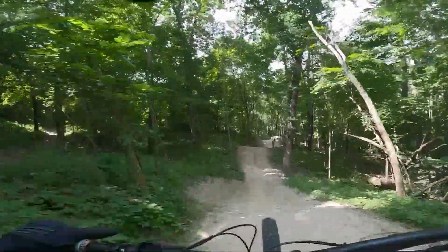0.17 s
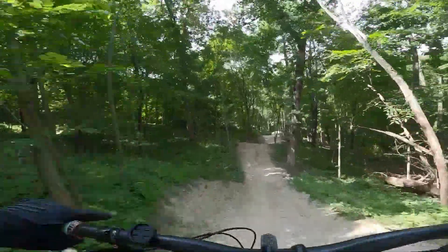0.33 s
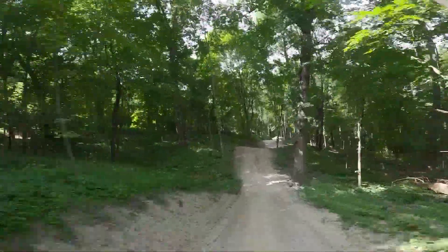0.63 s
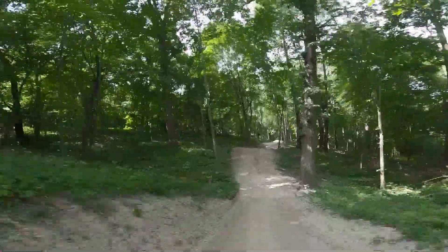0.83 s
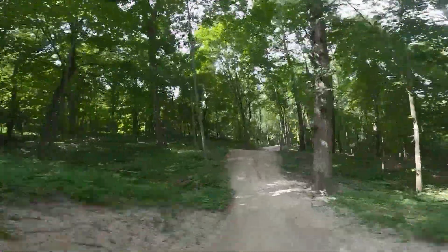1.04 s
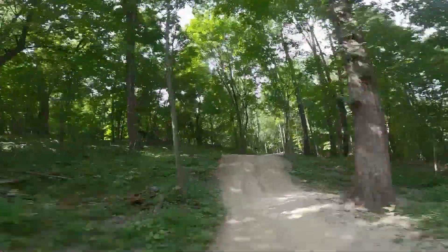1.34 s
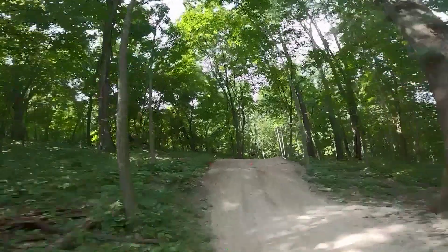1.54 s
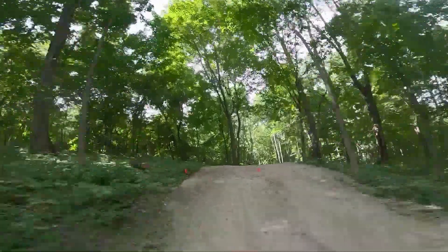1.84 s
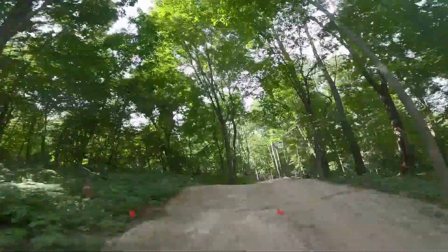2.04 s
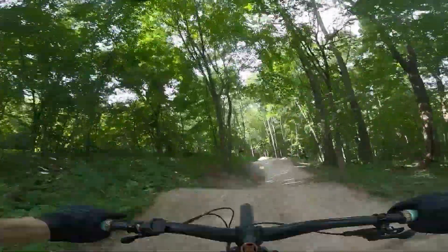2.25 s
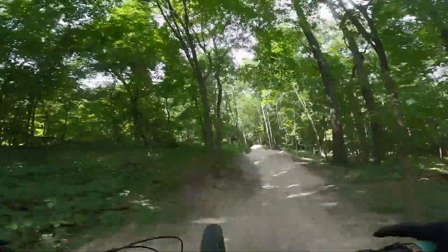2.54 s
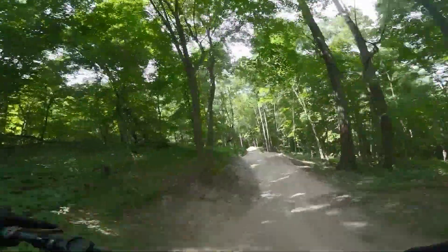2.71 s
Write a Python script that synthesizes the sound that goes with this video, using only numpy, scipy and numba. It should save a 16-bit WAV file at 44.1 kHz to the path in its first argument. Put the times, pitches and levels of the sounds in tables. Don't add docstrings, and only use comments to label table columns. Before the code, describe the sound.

A mountain bike rides a woodland dirt trail: a knock at take-off, windy quiet in the air, a hard clattering landing, bumpy rolling, then a second take-off thump and quiet. Close microphone on the rider, buffeted by wind.

```python
import sys
import numpy as np
from scipy import signal
from scipy.fft import rfft, irfft
from scipy.io import wavfile
from scipy.ndimage import uniform_filter1d
from numba import njit

SR = 44100
rng = np.random.default_rng(int(sys.argv[2]) if len(sys.argv) > 2 else 0)


def to_linear_factor(level_db):
    exponent = np.asarray(level_db, float) / 20
    return 10 ** exponent


def output_pcm(signal):
    pcm = np.clip(np.atleast_2d(signal).T, -1, 1) * 32767
    wavfile.write(sys.argv[1], SR, np.round(pcm).astype(np.int16))


N = 127008


def unit(x):
    return x / np.sqrt(np.mean(x ** 2))


def curve(table, axis=1):
    rows = np.array(table, float)
    return np.interp(np.arange(N) / SR, rows[:, 0], rows[:, axis])


@njit
def svf(x, centre_hz, width_hz):
    y, band_state, low_state = np.empty(len(x)), 0., 0.
    for i in range(len(x)):
        g = np.tan(np.pi * centre_hz[i] / SR)
        k = width_hz / centre_hz[i]
        v = (band_state + g * (x[i] - low_state)) / (1 + g * (g + k))
        band_state = 2 * v - band_state
        low_state = low_state + 2 * g * v
        y[i] = k * v
    return y


def band(x, centre_hz, width_hz):
    return svf(x, centre_hz * np.ones(len(x)), float(width_hz))


def band_twice(x, centre_hz, width_hz, second_width_hz):
    return unit(band(band(x, centre_hz, width_hz), centre_hz, second_width_hz))


def low_pass(x, order, top_hz):
    return signal.sosfilt(signal.butter(order, top_hz, fs=SR, output="sos"), x)


def walk(rate_hz):
    hold = int(SR / rate_hz)
    steps = np.repeat(rng.standard_normal(N // hold + 1), hold)
    slewed = uniform_filter1d(uniform_filter1d(steps, hold), hold)
    return unit(slewed[:N])


def grains(per_s, spread_db):
    hit = rng.random(N) < per_s / SR
    size_db = spread_db * np.minimum(rng.exponential(size=N), 3.5)
    return hit * to_linear_factor(size_db) * rng.standard_normal(N)


def shade(x, colour):
    f_hz = np.arange(N // 2 + 1) * SR / N + 1e-3
    hz, db = np.array(colour, float).T
    gain_db = np.interp(np.log(f_hz), np.log(hz), db, left=-90, right=-90)
    return irfft(rfft(x) * to_linear_factor(gain_db), N)


def body(x, peaks, stretch=1):
    modes = [(-1) ** k * to_linear_factor(db) * band(x, hz * stretch, width_hz)
             for k, (hz, width_hz, db) in enumerate(peaks)]
    return unit(sum(modes))


def hits(events, make):
    length = 4096
    out, t = np.zeros(N + length), np.arange(length) / SR
    for (start_s, peak_db, hz), noise in zip(events, rng.standard_normal((len(events), length))):
        sound = make(t, noise, hz)
        start = int(start_s * SR)
        out[start:start + length] += to_linear_factor(peak_db) * sound / np.abs(sound).max()
    return out[:N]


def wind():
    # start_s, level_db, treble_tilt_db
    strength = [(0, -15.5, 3), (.12, -17.5, 1.5), (.31, -15, -2.5), (.42, -18, -1), (.55, -22.5, 6.5),
                (.72, -18.5, -3), (1.04, -18, 1), (1.17, -19, 2), (1.56, -17.5, -0.5), (1.8, -20, 4),
                (2.1, -18, 4), (2.3, -14, 4), (2.34, -16.5, -20.5), (2.4, -19.5, -3), (2.5, -18, -3),
                (2.62, -23, -0.5), (2.72, -27.5, 4.5), (2.88, -33, 6.5)]
    # freq_hz, density_db (per Hz)
    colour = [(12, -24), (22, -0.5), (100, -3), (230, -15.5), (600, -24.5), (1700, -40), (5000, -51.5),
              (9000, -65), (14000, -85)]
    spectrum = rfft(shade(rng.standard_normal(N), colour))
    f_octave = np.log2(np.arange(N // 2 + 1) * SR / N + 1)
    gust_db = 1.5 * walk(1.45) + 1.27 * walk(22.15)
    tilt_db = curve(strength, axis=2)
    out = 0
    for octave in np.arange(4.5, 15):
        part = irfft(spectrum * np.clip(1 - np.abs(f_octave - octave), 0, 1), N)
        level_db = gust_db * np.clip((octave - 5) / 4, .1, 1.2) + 0.28 * walk(16)
        level_db = level_db + tilt_db * np.clip((octave - 8) / 3, 0, 1)
        out = out + part * to_linear_factor(level_db)
    return unit(out) * to_linear_factor(curve(strength))


def spray():
    # start_s, full_s, end_s, level_db
    bursts = [
        (0.51, 0.712, .82, -46.5),
        (2.733, 2.796, 3.0, -56.5),
    ]
    centre_hz, width_hz = 5940, 2500
    t = np.arange(N) / SR
    dust = band_twice(rng.standard_normal(N), centre_hz, width_hz, width_hz)
    swell = sum(to_linear_factor(level_db) * np.interp(t, [start_s, full_s, end_s - .02, end_s], [0.039, 0.87, 0.94, 0.012])
                for start_s, full_s, end_s, level_db in bursts)
    return dust * swell


def tick(t, noise, hz):
    t60_s, rise_s, crack_db = 0.054, 0.003, -4.5
    crack = to_linear_factor(crack_db) * unit(low_pass(band(noise, 3300, 3500), 3, 1.7 * min(hz, 6000)))
    width_hz = 230 * (hz / 4000) ** 2
    ring = band_twice(noise, hz, width_hz, 2 * width_hz)
    rise = np.minimum(t / rise_s, 1) ** 2
    decay = np.exp(-np.log(1000) * np.maximum(t - rise_s, 0) / t60_s)
    return (ring + crack) * rise * decay


def chain_and_cables():
    # start_s, peak_db, ring_hz
    events = [(.089, -27, 3720), (.096, -32, 3700), (.769, -25, 4640), (.77, -46, 11700), (.782, -33, 7730),
              (.801, -31, 4450), (.812, -41, 6950), (.844, -35, 4240), (.869, -43, 6600), (.922, -48, 8400),
              (.942, -34, 4050), (.943, -39, 7960), (1.002, -45, 8200), (1.093, -48, 7500),
              (1.094, -34, 4200), (1.266, -53, 6370), (1.543, -39, 3480), (1.585, -38, 5200),
              (1.731, -46, 7130), (1.758, -27, 4010), (1.759, -41, 8500), (1.76, -21, 1930),
              (1.887, -37.5, 5700), (1.951, -41, 4470), (2.088, -32.5, 3800), (2.198, -39.5, 5340),
              (2.238, -42, 6110)]
    return hits(events, tick)


def frame():
    # start_s, level_db
    jolt = [(0.0, -15.5), (0.09, -21), (0.24, -31.5), (0.35, -26), (0.41, -40), (0.67, -45.5),
            (0.76, -15.5), (0.9, -17.5), (0.92, -23.5), (1.2, -21), (1.42, -26.5), (1.47, -18.5),
            (1.68, -23.5), (1.7, -14.5), (1.88, -32.5), (2.34, -17), (2.36, -32.5), (2.88, -37.5)]
    # freq_hz, width_hz, level_db
    peaks = [(185.7, 91, -1), (261, 130.5, -0.5), (458, 124, -5), (600.5, 69, -11)]
    knocks = band(grains(per_s=520, spread_db=2.5), 310, 690)
    return body(knocks, peaks) * to_linear_factor(curve(jolt) - 1.5)


def hum():
    # start_s, level_db, knob_rate_hz
    tread = [(1.72, -20, 430), (1.8, -18.5, 440), (1.9, -24.5, 487), (1.97, -21.5, 490), (2.04, -21, 455),
             (2.09, -23.5, 537), (2.145, -17.5, 482), (2.22, -25, 474), (2.3, -36, 450)]
    width_hz, rise_s, fall_s = 71, 0.19, 0.093
    t = np.arange(N) / SR
    knob_hz = curve(tread, axis=2) * (1 + 0.032 * walk(25.5))
    tone = band_twice(rng.standard_normal(N), knob_hz, width_hz, 3 * width_hz)
    gate = np.clip((t - tread[0][0]) / rise_s, 0, 1) * np.clip((tread[-1][0] - t) / fall_s, 0, 1)
    wobble_db = 1.5 * walk(26)
    return tone * gate * to_linear_factor(curve(tread) - 0.8 + wobble_db)


def blow(t, noise, hz):
    t60_s, rise_s, sag, sag_s, roughness = 0.05, 0.0037, .15, 0.018, 0.12
    pace = (hz / 200) ** 0.3
    ring = np.sin(2 * np.pi * hz * t * (1 - sag * np.minimum(t / sag_s, 1)))
    rough = roughness * unit(low_pass(band(noise, hz, hz / 2), 4, 2 * hz))
    rise = np.sin(np.pi / 2 * np.minimum(t * pace ** 2 / rise_s, 1)) ** 2
    return (ring + rough) * rise * np.exp(-np.log(1000) * t * pace / t60_s)


def blows():
    # start_s, peak_db, ring_hz
    events = [(.042, -14, 148), (.102, -14.5, 226), (.181, -12, 127), (.285, -16.5, 192),
              (.719, -15.5, 1390), (.731, -21.5, 1950), (.757, -10, 1520), (.758, -25, 1070),
              (.768, -14, 294), (.787, -28, 2400), (.806, -6.5, 213), (.838, -12, 161), (.85, -4.5, 197),
              (.87, -19, 830), (.882, -4, 181), (1.009, -10, 227), (1.115, -16.5, 214), (1.17, -6.5, 250),
              (1.258, -11.5, 184), (1.467, -16.5, 191), (1.5, -13, 375), (1.543, -14, 204),
              (1.557, -13, 238), (1.6, -6.5, 157), (1.701, -17.5, 757), (1.706, -12, 293),
              (1.719, -11.5, 166), (1.908, -18, 138), (2.306, -14.5, 333), (2.317, -7, 162),
              (2.334, -21, 265)]
    return to_linear_factor(-1.5) * hits(events, blow)


def tyres():
    # start_s, level_db, brightness_db
    contact = [(0, -28.5, -28), (.06, -40, 4), (.1, -34, 0.5), (.15, -48.5, 4.5), (.48, -48.5, 5),
               (.68, -31, 3), (.79, -27.5, 3.2), (.83, -41, 2.5), (.93, -34.5, -1), (1.2, -35, 1.5),
               (1.45, -37.5, 1), (1.6, -38, 7.5), (1.71, -36.5, 2.5), (2.1, -26, -6), (2.29, -39.5, 1.5),
               (2.33, -57.5, 10.5), (2.55, -45, 1.5), (2.72, -74, 20), (2.775, -44.5, 5.5)]
    # freq_hz, width_hz, level_db
    peaks = [(1000, 200, -2.5), (1454, 137, 3), (1800, 235, -1), (2340, 92, -4), (2920, 680, -22)]
    # start_s, pitch_ratio
    stiffness = [(0, 0.96), (.55, 1.25), (.62, 0.95), (.68, 1), (.77, 1.015), (1.2, 1), (1.75, 0.99),
                 (2.1, 0.96), (2.3, 1.08), (2.88, 0.98)]
    # freq_hz, density_db (per Hz)
    colour = [(1600, -48), (2600, 2.5), (3300, 0), (4600, -5), (6000, -16), (8500, -18.5), (11500, -39.5),
              (14000, -57)]
    grit = unit(grains(per_s=3000, spread_db=2.5)) + 0.66 * rng.standard_normal(N)
    bumps_db = np.clip(1.3 * walk(40) + 1.1 * walk(80), -6, 2.5)
    stretch = curve(stiffness) * (1 + 0.048 * walk(14))
    casing = to_linear_factor(1.8) * body(band(grit, 1300, 2600), peaks, stretch)
    hiss_db = -10.5 + curve(contact, axis=2) + 2 * walk(30.12)
    hiss = unit(shade(grit, colour)) * to_linear_factor(hiss_db)
    return (casing + hiss) * to_linear_factor(curve(contact) + bumps_db)


def thump(t, noise, hz):
    length_s, peak_share, low_hz = 0.026, 0.37, 382
    dark = low_pass(band(noise, low_hz, 1.3 * low_hz), 4, hz)
    swell = np.interp(t / length_s, [0, peak_share, 1], [0, 1, 0])
    return dark * np.sin(np.pi / 2 * swell) ** 2


def wheels():
    # start_s, peak_db, top_hz
    events = [(.09, -10.5, 1800), (.125, -21, 1490), (.714, -20, 2000), (.753, -12, 2020), (.78, -10, 2400),
              (.806, -14, 1000), (.864, -14, 1000), (.879, -22, 590), (1.112, -11, 690), (1.169, -14, 630),
              (1.495, -19, 774), (1.54, -14.5, 650), (1.692, -12, 940), (1.71, -25, 710),
              (2.287, -7.5, 1100), (2.304, -6.5, 2250), (2.326, -6, 1300)]
    return to_linear_factor(-3) * hits(events, thump)


def scene():
    background = wind() + spray() + chain_and_cables()
    bike = frame() + hum() + blows() + tyres() + wheels()
    return (background + bike)[None]


def top_cut(x):
    return signal.sosfilt(signal.butter(12, 14190, fs=SR, output="sos"), x)


def record(dry):
    # freq_hz, width_hz, share_added (ratio)
    port_modes = [(2200, 160, -0.25), (2410, 280, 0.45)]
    coloured = dry + sum(share * band(dry[0], hz, width_hz) for hz, width_hz, share in port_modes)
    rounded = 0.58 * np.tanh(coloured / 0.7)
    return top_cut(rounded)


dry = scene()
out = record(dry)
output_pcm(out)
```